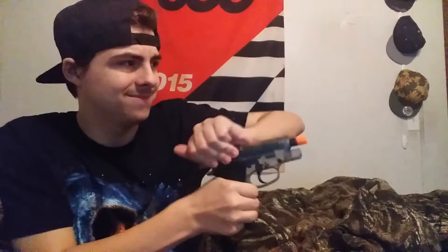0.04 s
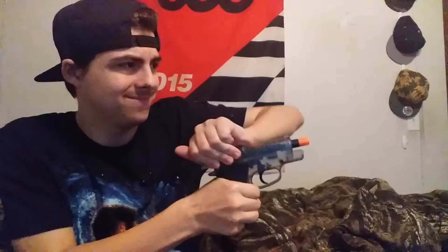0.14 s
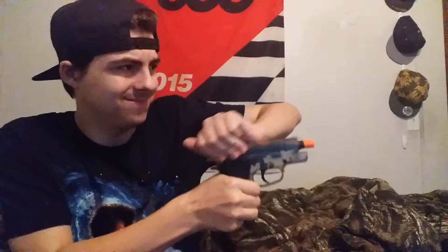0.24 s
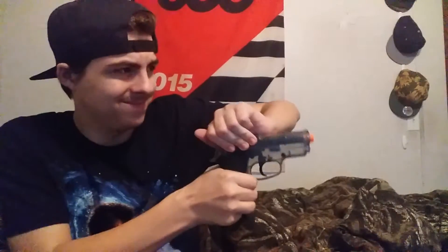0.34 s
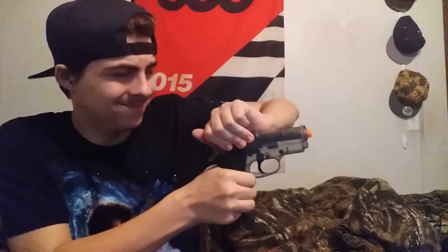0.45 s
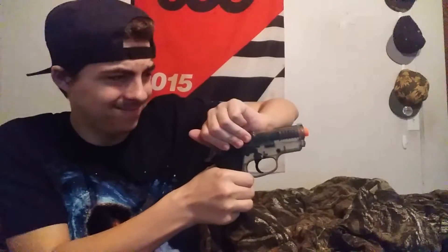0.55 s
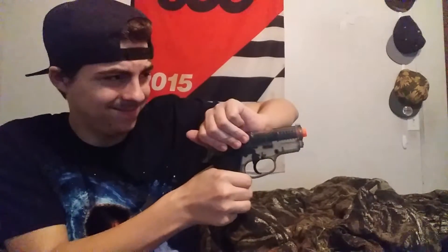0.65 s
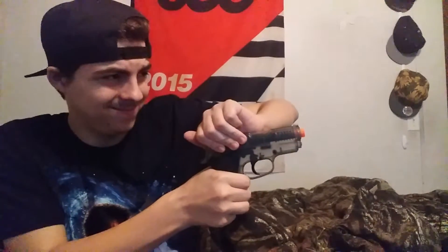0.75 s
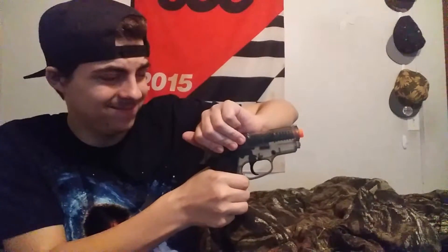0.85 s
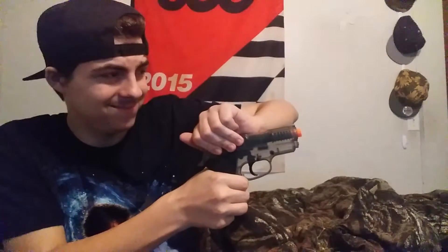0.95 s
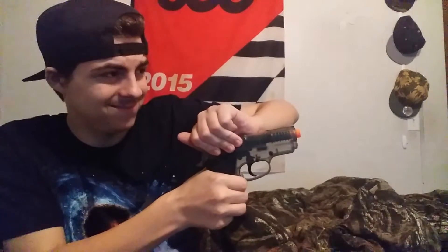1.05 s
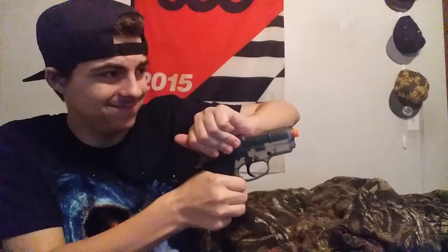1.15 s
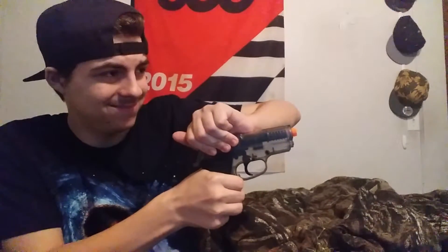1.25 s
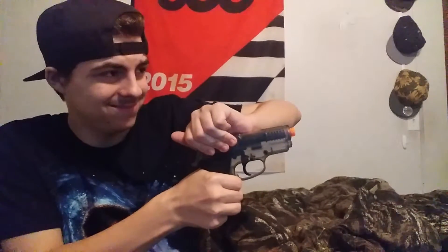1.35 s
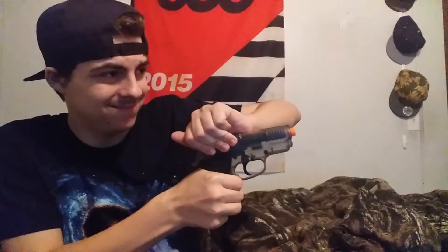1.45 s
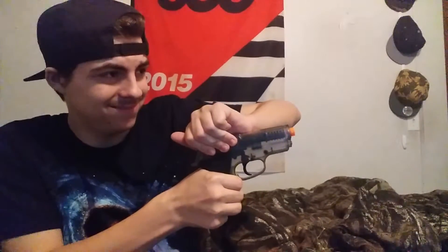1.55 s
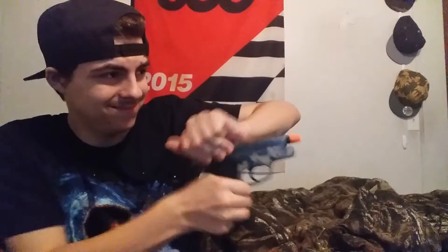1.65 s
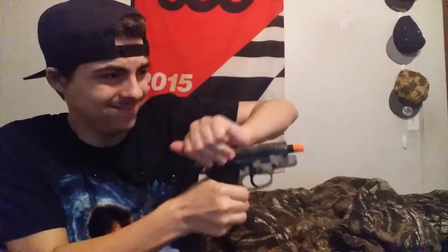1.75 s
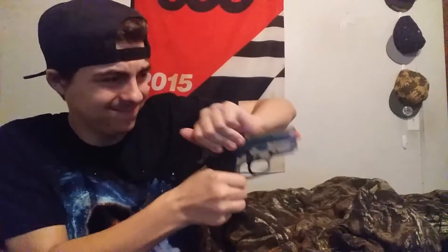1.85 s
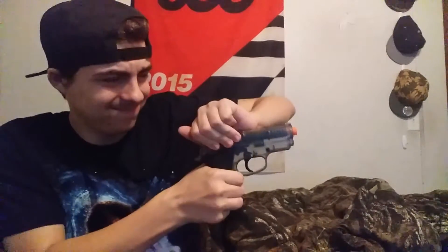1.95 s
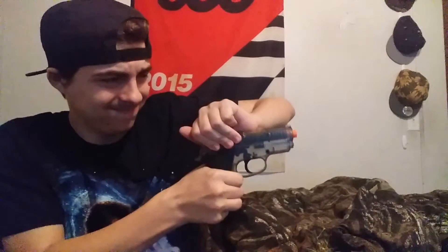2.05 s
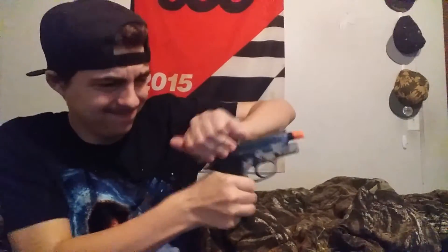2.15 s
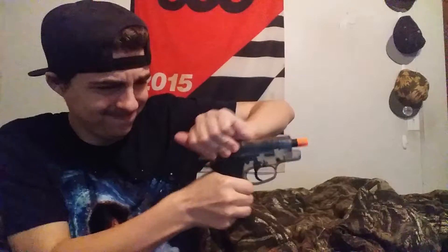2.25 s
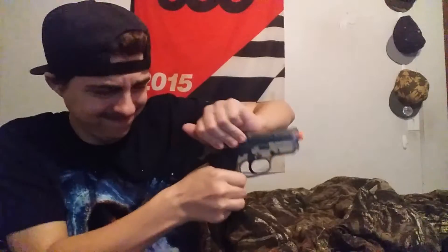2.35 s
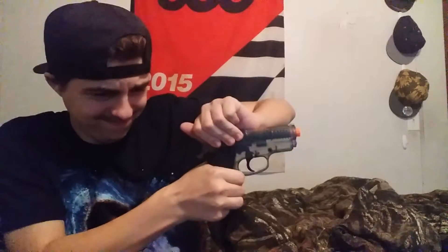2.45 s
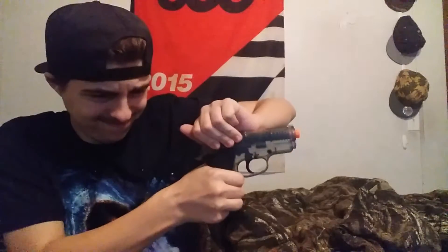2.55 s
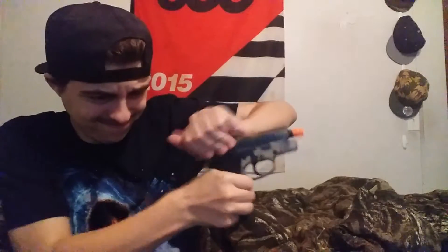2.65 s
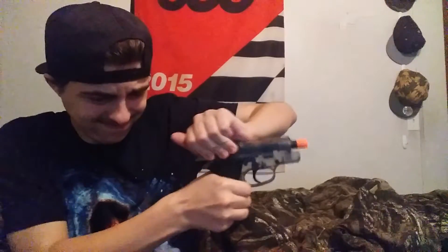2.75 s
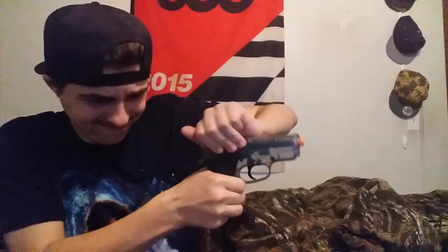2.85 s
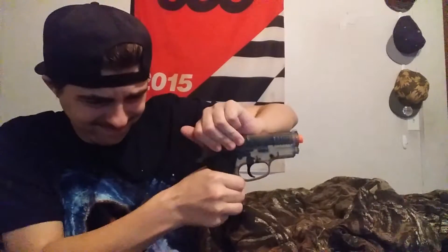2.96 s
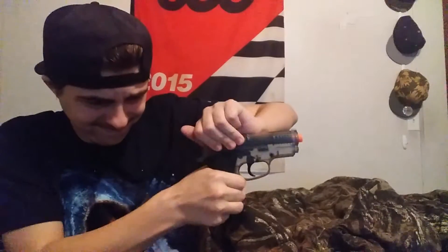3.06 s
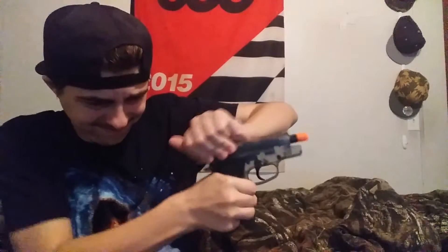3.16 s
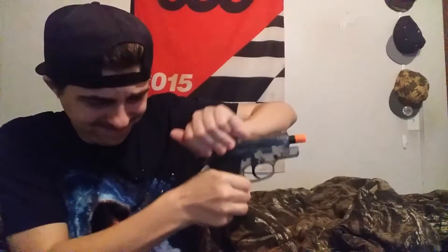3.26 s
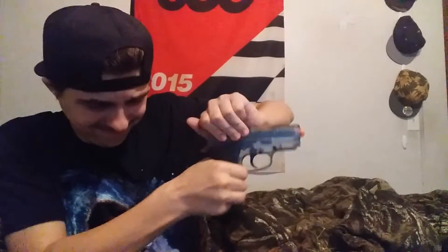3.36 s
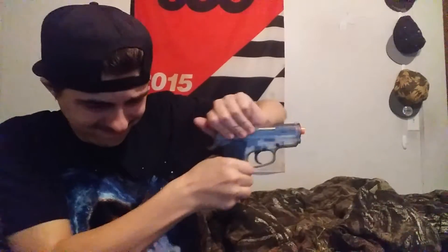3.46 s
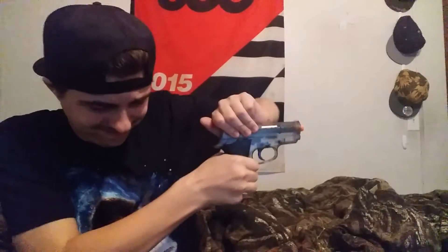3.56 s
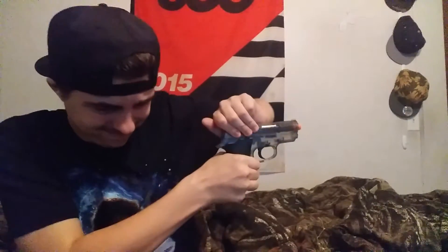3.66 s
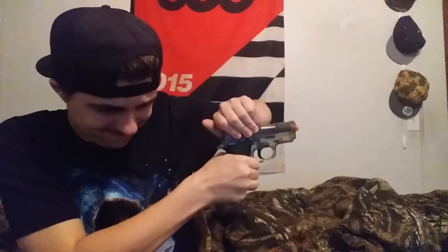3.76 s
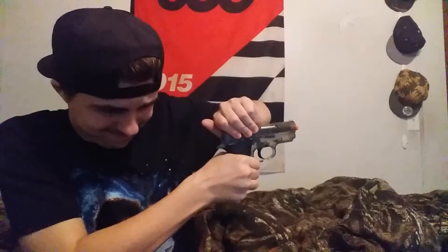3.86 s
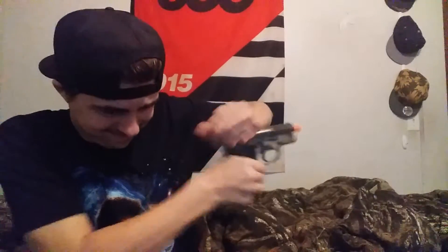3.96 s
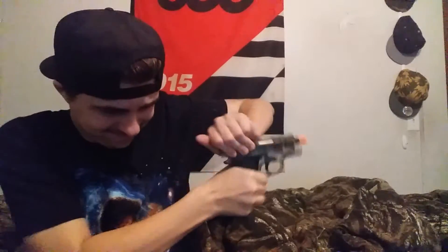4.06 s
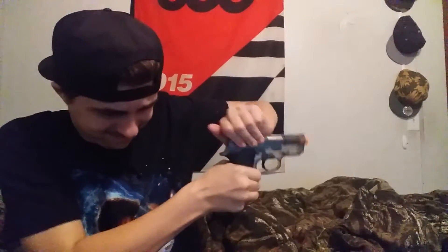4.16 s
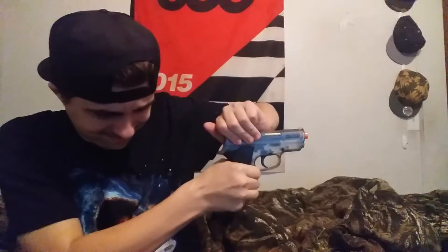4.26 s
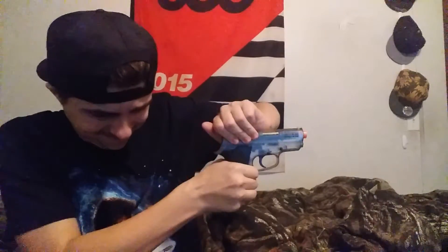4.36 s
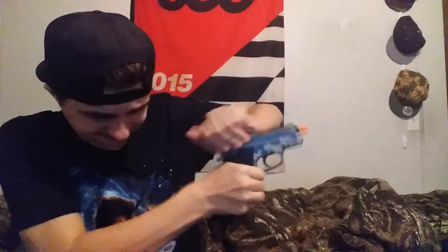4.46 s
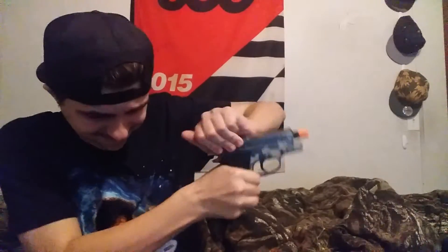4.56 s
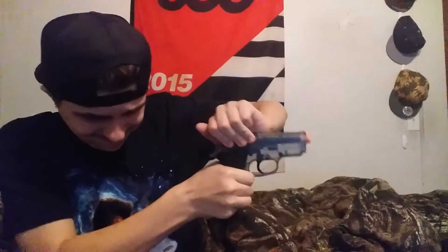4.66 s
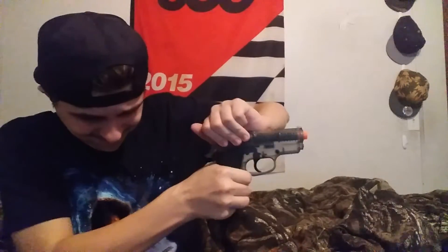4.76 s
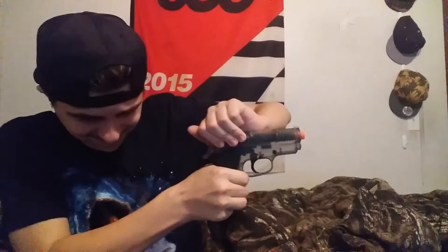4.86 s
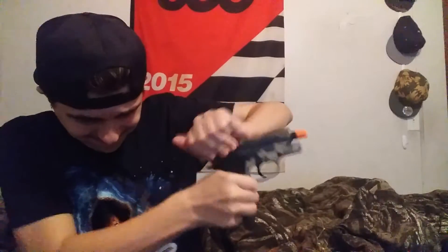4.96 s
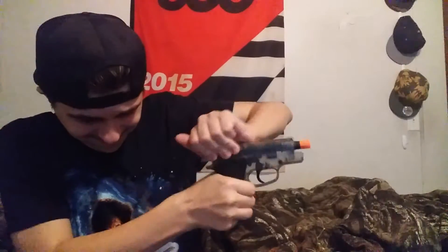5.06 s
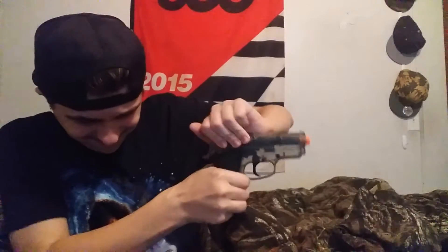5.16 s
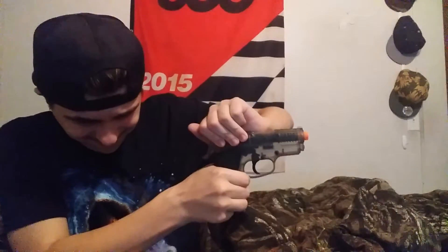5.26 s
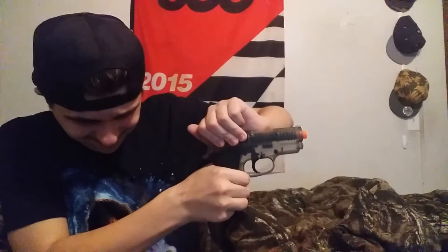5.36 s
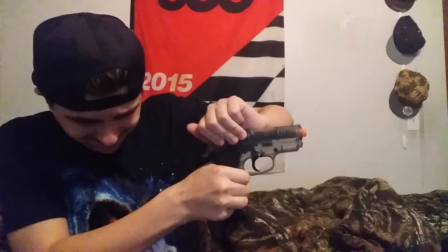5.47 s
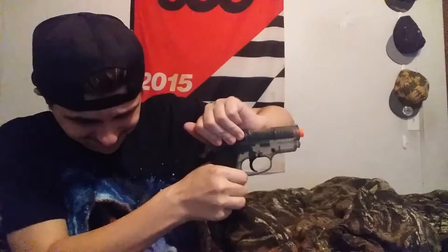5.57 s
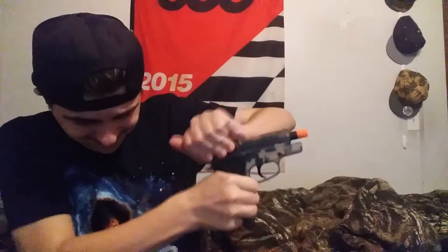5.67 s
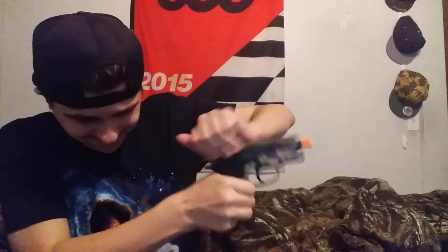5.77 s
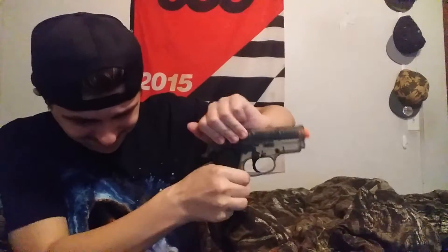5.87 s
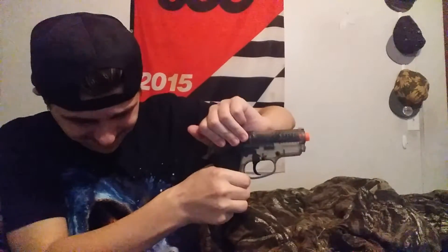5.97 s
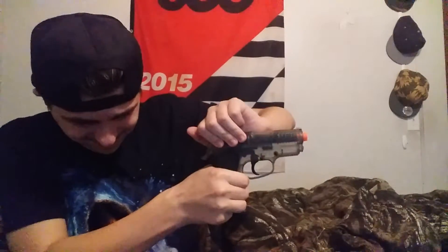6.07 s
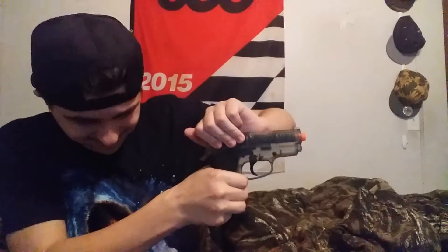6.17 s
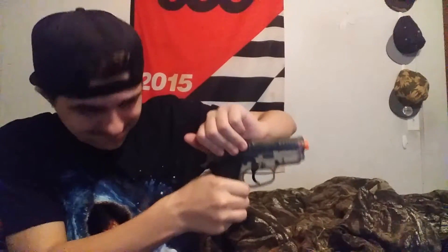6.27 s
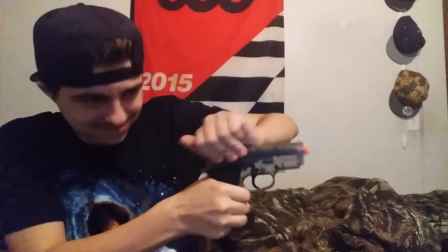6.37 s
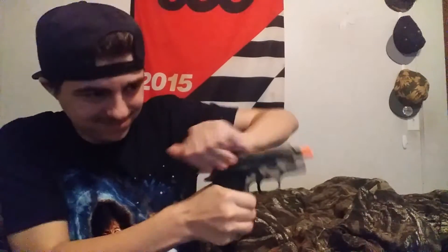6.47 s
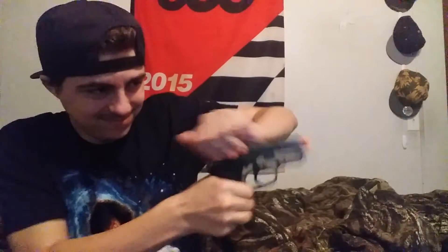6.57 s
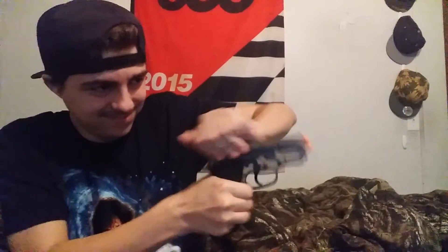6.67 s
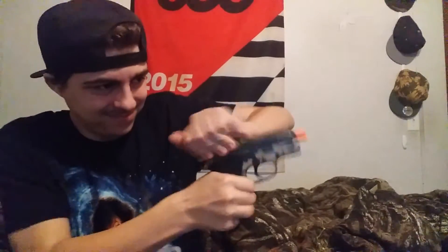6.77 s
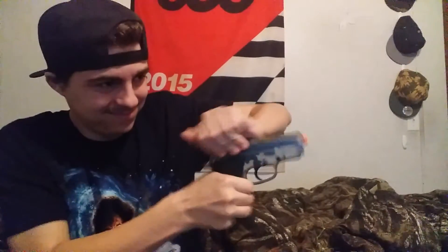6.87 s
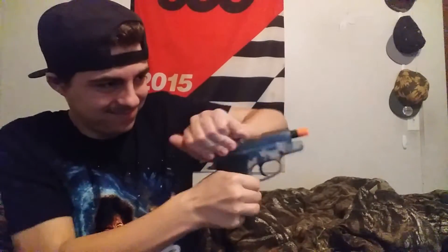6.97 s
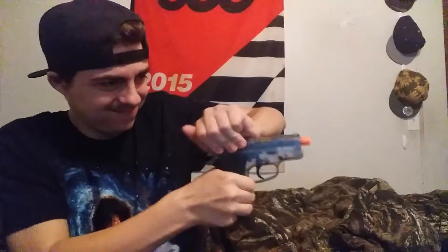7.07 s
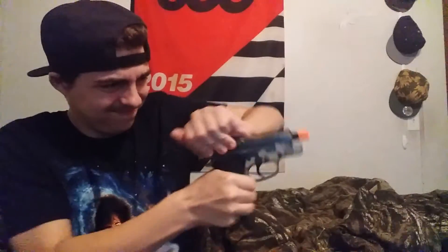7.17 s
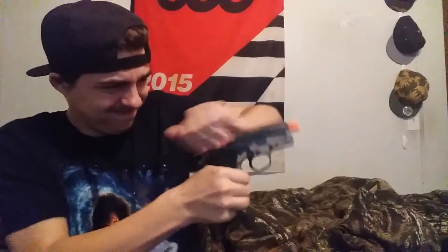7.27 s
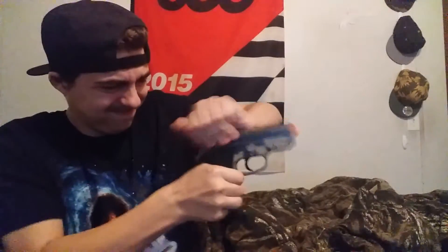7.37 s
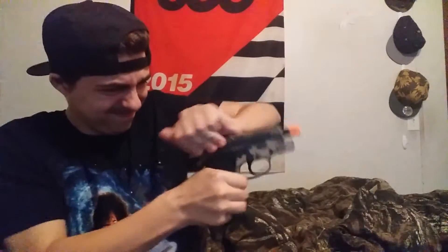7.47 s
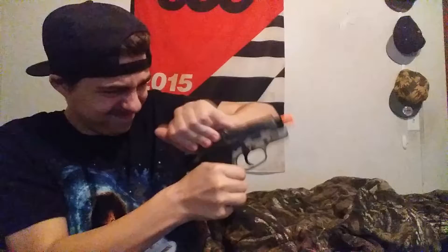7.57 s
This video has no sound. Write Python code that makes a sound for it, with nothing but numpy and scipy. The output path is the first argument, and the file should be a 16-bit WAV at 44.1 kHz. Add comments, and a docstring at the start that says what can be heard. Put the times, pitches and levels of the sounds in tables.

```python
"""A spring airsoft pistol is racked and fired again and again in a small room, close to the microphone.
The plastic slide sticks and slips back, then clacks against its stop: noise bursts and damped knocks.
The piston slams forward with a falling bass swing and a puff of air; decaying sines ring on after it.
Pellets strike across the room a moment later as reverberant ticks, and a few skip off things.
Faint rumble and hiss of the room, made of coloured noise, lie beneath."""
import sys
import numpy as np
from scipy import signal
from scipy.fft import rfft, irfft
from scipy.io import wavfile

SR = 44100
rng = np.random.default_rng(int(sys.argv[2]) if len(sys.argv) > 2 else 0)


def inscribe(sig):
    """Save sig as 16-bit PCM at rate SR to the path in sys.argv[1].

    A 1-D sig is mono; a 2-D sig holds one channel per row.
    Samples are clipped to [-1, 1] before scaling.
    """
    pcm = np.round(np.clip(np.atleast_2d(sig).T, -1, 1) * 32767)
    wavfile.write(sys.argv[1], SR, pcm.astype(np.int16))


N = 336264  # length in samples
T = np.arange(SR * 3 // 5) / SR  # time axis of one short sound, s
HZ = np.fft.rfftfreq(4096, 1 / SR)  # frequency axis of the colour filters, Hz

# Levels in the tables are relative: each function adds its own gain.
# The piston slams home after the slide has run forward: t/s, blow level/dB, thump level/dB,
# spring t60/s (set by the grip), travel time/s, slip level/dB
SLAMS = [(0.386, -5.5, -33.5, .8, 0.031, -8.5), (1.886, -8, -25.5, 0.97, 0.023, -7.5),
         (2.384, -10, -26, 1, 0.02, -10), (2.884, -9.5, -51.5, 1, 0.022, -11.5),
         (3.394, -8.5, -35.5, 1.1, .017, -13), (4.202, -6.5, -31, 1, 0.016, -9.5),
         (4.712, -7, -22.5, 1.2, 0.016, -5.5), (5.195, -6, -36, 1.2, 0.02, -9),
         (5.875, -8.5, -22, 1.8, 0.016, -10.5), (6.614, -11, -32, 0.33, 0.014, -18.5),
         (7.309, -10, -23.5, 0.73, 0.015, -14.5)]
# The slide hits its stop; the one at 5.26 s is a thud just after a shot: t/s, knock level/dB, knock f/Hz,
# crack level/dB, thump level/dB, time since the slip before it/s, slip level/dB
STOPS = [(0.125, -22, 1830, -16.5, -53, 0.036, -15), (1.7484, -12, 1700, -11, -26.5, 0.026, -13.5),
         (2.2414, -18, 1805, -16, -46, 0.03, -13), (2.7518, -16, 1670, -17, -49, .032, -12.5),
         (3.2358, -16, 1645, -15.5, -45, 0.038, -14), (4.065, -14.5, 2050, -15, -50, 0.028, -13),
         (4.5691, -14, 1770, -13.5, -53, .036, -10), (5.0557, -13.5, 1770, -13.5, -50.5, 0.037, -10.5),
         (5.2589, -42, 1650, -18.5, -25.5, 0.037, -27), (5.7414, -10, 1707, -17, -52, .029, -13),
         (6.5109, -13.5, 1760, -22, -52, .028, -19.5), (7.0469, -15.5, 1830, -20, -48, 0.024, -16),
         (7.184, -12, 1680, -28.5, -74, .035, -19.5), (7.5108, -22, 1500, -22, -46, 0.031, -16)]
# Spectrum of hard plastic contact: f/Hz, level per Hz/dB
CRACK_SPECTRUM = [(88, -61), (150, -20), (466, -23), (1060, -5), (1530, -9), (1790, -0.5), (2270, -7.5),
                  (2550, -5.5), (2920, -7.5), (4410, -10), (9820, -13), (15100, -14), (16000, -5)]


def shots(count=3, rattle_db=-7):
    """Impact and rebound: the piston slams home, excites the modes and spring, and pushes out a puff of air."""
    # spectrum of the slam: f/Hz, level per Hz/dB
    slam_spectrum = [(88, -48.5), (150, -24), (240, -22.5), (675, -11.5), (960, 0), (1190, -7.5),
                     (1560, -5.5), (2600, -11), (2920, -8), (3420, -12), (4860, -13.5), (5570, -16),
                     (7920, -14.5), (8730, -22.5), (16000, -23)]
    treble_lift_db = 3.5  # reached two octaves above 2 kHz
    puff_db, puff_share = 15.5, 0.59  # the hollow puff grows by this share of the thump's dB
    lift = np.clip(np.log2((HZ + 1) / 2000) / 2, 0, 1)
    blow_db = read(slam_spectrum, HZ) + treble_lift_db * lift
    out = np.zeros((2, N))
    for s, db, thump_db, spring_t60, *_ in SLAMS:
        blow = burst(blow_db, length=0.0046, alike=0.49)
        for k, when in enumerate(rng.random(count)):  # rebounds
            rattle = amp(rattle_db - 2 * k) * burst(blow_db, length=0.0022, alike=0.14)
            add(blow, .007 + .007 * (k + when), rattle)
        blow = amp(db + 18.5) * blow
        add(out, s, room(blow, wet_db=-0.5, near_db=-6.5, walls_db=-6.0, near_decay=0.027))
        first_touch = amp(db + 6.5) * burst(blow_db, length=0.0047, alike=0.15)
        add(out, s - .002, first_touch)  # a first light contact leads into the slam
        puff_gain = amp(puff_db + puff_share * thump_db)
        puff = puff_gain * burst(hump(470, steep_db=6.5), length=0.0012, alike=0.78)
        add(out, s + .001, room(puff, wet_db=-18.5, near_db=-0.5, walls_db=-9.5, alike=1.0))
        add(out, s + 0.0017, amp(thump_db + 35.5) * thump())
        add(out, s + 0.001, amp(db - 1.0) * ring())
        add(out, s, spring(spring_t60))
    return out


def spring(t60):
    """Beating of two close modes: the coil rings on and a weak twin mode beats slowly against it."""
    main_hz, twin_hz = 958, 963.5
    level_db, twin_db = -52, -13  # the twin is relative to the main mode
    t = np.arange(2 * SR) / SR
    main = np.sin(2 * np.pi * main_hz * t)
    twin = amp(twin_db) * np.sin(2 * np.pi * (twin_hz * t + rng.random()))
    return amp(level_db) * 1000 ** (-t / t60) * (main + twin)


def ring(detune=0.00073, scatter_db=2):
    """Modal ringing: damped modes of gun and room differ a little in pitch and level from blow to blow."""
    # modes of gun and room, before scatter; the lowest few are the room's, the others the gun's:
    # f/Hz, level/dB, t60/s
    modes = [(395, -29, .2), (544, -28, .16), (613, -26, .18), (836, -26, .14), (972, -18, .12),
             (993, -13, .18), (1102, -20, .15), (1545, -19, .16), (1818, -18, .2), (2412, -24, .19),
             (2912, -21, .17), (3550, -25, .19), (4218, -24, .18), (4772, -21, .14), (7338, -24, .17)]
    out = np.zeros((2, len(T)))
    draws = rng.standard_normal((len(modes), 4))
    for (hz, db, t60), (shift, size, phase, side) in zip(modes, draws):
        port_phase = side * np.array([[.1], [-.1]])
        turns = hz * (1 + detune * shift) * T + phase + port_phase
        out += amp(db + scatter_db * size) * 1000 ** (-T / t60) * np.sin(2 * np.pi * turns)
    return out


def thump(rise=0.0012, decay=.011, extra_hz=400, end_hz=30, fall=0.0014, port_lead=0.28):
    """Phase dispersion: an air pulse at the microphone, smeared by its high-pass into a falling bass swing."""
    hz = end_hz + extra_hz / (1 + T / fall)
    port_turns = np.array([[.5], [-.5]]) * port_lead  # the two ports are out of step
    phase = 2 * np.pi * np.cumsum(hz) / SR + port_turns
    return -unit((1 - np.exp(-T / rise)) * np.exp(-T / decay) * np.sin(phase))


def clacks(latch_lead=0.0072):
    """Impact on a stop: a sear click, then a bright crack, a hollow knock and a thump; once mostly a thud."""
    out = np.zeros((2, N))
    for s, db, hz, crack_db, thump_db, *_ in STOPS:
        add(out, s - latch_lead, amp(db - 2.5) * knock(1350, rise=0.0021))
        crack = amp(crack_db + 25.0) * burst(read(CRACK_SPECTRUM, HZ), length=.003, alike=0.57)
        add(out, s, room(crack, wet_db=1, near_db=-5.5, walls_db=-3.5))
        shell = amp(db + 19) * knock(hz, rise=0.0013)
        add(out, s + 0.00058, room(shell, wet_db=-12.5, near_db=-2.5, walls_db=-8.0))
        add(out, s, amp(db - 14.5) * ring())
        add(out, s + 0.0019, amp(thump_db + 29) * thump())
    return out


def slide():
    """Stick-slip friction: the slide slips before each stop and shot, or as the hand shifts."""
    # the hand shifts on the gun between strokes: t/s, knock level/dB, nominal knock f/Hz
    fumbles = [(0.008, -40.5, 1030), (0.253, -25.5, 1935), (1.1397, -32.5, 1700), (6.7322, -19, 1560),
               (6.8453, -20.5, 1393), (6.93, -24.5, 1540), (6.9534, -27.5, 1810)]
    fumble_scrape_db, fumble_spread = -13.5, .008  # dB, s
    # each blow is preceded by a weak nudge, at a multiple of the travel time before it;
    # then by the main slip, one travel time before it
    pull_nudge, pull_nudge_db, pull_hz, pull_scrape_db = 1.8, -15, 1640, -11.5
    return_nudge, return_nudge_db, return_hz, return_scrape_db = 1.1, -7, 1620, -8.5
    nudge_scrape_db = -15
    stutter_share = .45  # of the travel time: how early the small slips begin
    moves = [(s, db, hz, fumble_scrape_db, fumble_spread) for s, db, hz in fumbles]
    for s, *_, travel, db in STOPS:
        spread = stutter_share * travel
        moves.append((s - pull_nudge * travel, db + pull_nudge_db, pull_hz, nudge_scrape_db, spread))
        moves.append((s - travel, db, pull_hz, pull_scrape_db, spread))
    for s, *_, travel, db in SLAMS:
        spread = stutter_share * travel
        moves.append((s - return_nudge * travel, db + return_nudge_db, return_hz, nudge_scrape_db, spread))
        moves.append((s - travel, db, return_hz, return_scrape_db, spread))
    out = np.zeros((2, N))
    for s, db, hz, scrape_db, spread in moves:
        add(out, s - spread, slip(db, hz, scrape_db, spread))
    return out


def slip(db, hz, scrape_db, spread, count=5, stutter_db=-11):
    """Release of friction: a knock and a scrape amid smaller slips that begin spread seconds before."""
    out = np.zeros((2, len(T)))
    add(out, spread + .001, amp(5) * knock(hz * .95, rise=0.00064))
    scrape = amp(scrape_db + 11.5) * burst(scrape_colour(), length=0.0033, alike=0.45)
    add(out, spread + 0.00081, scrape)
    add(out, .003, amp(scrape_db + 16.0) * grit(length=2 * spread))
    for k, (when, pitch, size) in enumerate(rng.random((count, 3))):
        small_hz = hz * 2 ** (.9 * (pitch - .7))
        small = amp(12.5 + stutter_db + 10 * (size - 1.0)) * knock(small_hz, rise=0.0011)
        add(out, .002 + 1.8 * spread * (k + when) / count, small)
    return amp(db) * room(out, wet_db=-1.0, near_db=-7.5, walls_db=-8.0)


def grit(length, count=14):
    """Granular friction: a few sharp grains of very unequal size swell and fade with the slip."""
    when, size, side = rng.random((count, 3)).T
    grains = np.zeros((2, len(T)))
    left_at = (when * length * SR).astype(int)
    right_at = left_at + (8 * side).astype(int)  # the right port lags by up to 7 samples
    signs = (-1.) ** np.arange(count)
    heights = np.sin(np.pi * when) * size ** 3 * signs
    grains[0, left_at] = heights
    grains[1, right_at] = heights
    return unit(colour(grains, scrape_colour()))


def scrape_colour():
    """Friction spectrum: plastic rubbing on the rail is duller than a crack; dB over HZ."""
    dull_db = -2.5  # per octave above 2 kHz
    return read(CRACK_SPECTRUM, HZ) + dull_db * np.log2(np.maximum(HZ / 2000, 1))


def knock(hz, rise):
    """Heavily damped resonance: the hand-held plastic shell swells and dies within a few cycles."""
    swell = (T / rise) ** 2 * np.exp(-2 * T / rise)
    return unit(swell * np.sin(2 * np.pi * (hz * T + rng.random())))


def burst(db, length, alike, evenness=0.38):
    """Broadband impact: a short chatter of hard contacts of colour db, partly alike at the two ports."""
    window = np.exp(-(T / length) ** 4) * (1 - np.exp(-8 * T / length))
    chatter = port_noise(len(T), alike) * window
    for _ in range(2):
        spectrum = rfft(chatter)
        # hard contacts excite all pitches much alike
        even = spectrum / (abs(spectrum) + 1e-12) ** np.clip(evenness, 0, 1)
        chatter = irfft(even, len(T)) * np.exp(-(T / length / 1.6) ** 4)
    return unit(colour(chatter, db))


def pellets():
    """Time of flight: each loaded shot hits across the room and ricochets at once; strays skip later."""
    # flight time across the room/s, shot by shot; the magazine is empty for the last three shots
    flight_times = [.063, .065, .061, .066, .066, .0615, .0635, .065]
    # spent pellets skip off things across the room: t/s, tick level/dB, top treble level/dB,
    # direct level against the tick/dB, body level/dB, body f/Hz
    strays = [(0.8915, -19, 8, 6.5, -49.5, 360), (0.9976, -33, 5, 10, -48, 715),
              (1.096, -37.5, -2, 7, -61, 450), (3.763, -21, 0.5, 6.5, -43, 301),
              (5.5719, -17.5, 2.5, 1, -50.5, 305)]
    ricochet_delay, skip_delay, skip_db = .0085, .0042, -1.5  # s, s, dB
    out = np.zeros((2, N))
    for (s, *_), flight in zip(SLAMS, flight_times):
        hit = strike(-14, treble_db=0.5, direct_db=4, body_db=-41.5, body_hz=290)
        add(out, s + flight, hit)
        ricochet = strike(-14, treble_db=5, direct_db=11.5, body_db=-37, body_hz=245)
        add(out, s + flight + ricochet_delay, ricochet)
    for s, *touch in strays:  # each touches twice
        add(out, s, strike(*touch))
        add(out, s + skip_delay, amp(skip_db) * strike(*touch))
    return out


def strike(db, treble_db, direct_db, body_db, body_hz):
    """Reverberant impact: a far, sharp tick mostly by way of the room, and a dull boom of what was hit."""
    # spectrum of the tick: f/Hz, level per Hz/dB
    tick_spectrum = [(71, -22), (120, -8.5), (348, -5), (546, -1.5), (856, -4.5), (1160, -7.5), (2070, -1),
                     (3170, -2), (4880, 0), (5750, -4), (6770, -0.5), (14700, -8), (16000, -1)]
    tilt_db = treble_db * np.clip((HZ - 7000) / 7000, -1, 1)
    tick = amp(db + 9.5) * burst(read(tick_spectrum, HZ) + tilt_db, length=.0012, alike=0.042)
    boom = amp(body_db + 13.5) * burst(hump(body_hz, steep_db=4.5), length=.004, alike=0.89)
    direct = amp(direct_db) * tick
    far_tick = room(tick, wet_db=10.5, near_db=11.5, walls_db=-7.0, near_decay=0.023, alike=0.019)
    far_boom = room(boom, wet_db=12.5, near_db=-21.0, walls_db=-1.5, alike=1.0)
    return direct + far_tick + far_boom


def hump(hz, steep_db):
    """Broad resonance: dB over HZ, falling by steep_db one octave from its centre."""
    return -steep_db * np.log2((HZ + 1) / hz) ** 2


def room(x, wet_db, near_db, walls_db, near_decay=0.0048, alike=0.19):
    """Room impulse response: direct sound, wall echoes, quick near scatter and a tail dying band by band."""
    # reverberation: f/Hz, t60/s
    room_t60 = [(100, 0.55), (300, 0.35), (700, 0.3), (1800, 0.35), (4000, 0.36), (8000, 0.31),
                (15000, 0.24)]
    # first reflections off the walls: nominal delay/s, relative level/dB
    walls = [(.0067, -20), (0.0142, -27.5), (0.0219, -11)]
    noise = port_noise(len(T), alike)
    hz, t, bands = signal.stft(noise, SR, nperseg=256)
    decay = amp(-60 * t / read(room_t60, hz)[:, None])
    tail = signal.istft(bands * decay, SR, nperseg=256)[1][:, :len(T)]
    response = amp(wet_db) * unit(tail * (1 - np.exp(-T / 0.0022)))
    response += amp(near_db) * unit(noise[:, ::-1] * T * np.exp(-2 * T / near_decay))
    response[:, 0] += 1  # direct sound
    for delay, db in walls:
        port_delays = delay + rng.uniform(-0.0005, 0.00033, 2)
        at = np.round(port_delays * SR).astype(int)
        response[[0, 1], at] += amp(db + walls_db)
    return signal.fftconvolve(x * np.ones((2, 1)), response, axes=1)[:, :len(T)]


def floor():
    """Stationary background noise: the faint steady rumble and hiss of the room."""
    # spectrum of the background: f/Hz, relative level per Hz/dB
    floor_spectrum = [(15, -68.5), (27, -44), (46, -7.5), (64, -3.5), (108, -4.5), (145, -26), (185, -8),
                      (206, -21), (363, -30.5), (16000, -53.5)]
    level_db = -70.5  # RMS in each channel of the dry mix
    noise = rng.standard_normal((3, N))
    ports = noise[0] + 0.71 * noise[1:]
    return amp(level_db) * np.sqrt(N) * unit(colour(ports, read(floor_spectrum, HZ)))


def port_noise(length, alike):
    """Partial coherence: white noise at two ports that share the fraction alike of their energy."""
    noise = rng.standard_normal((3, length))
    alike = np.clip(alike, 0, 1)
    return np.sqrt(alike) * noise[0] + np.sqrt(1 - alike) * noise[1:]


def colour(x, db):
    """Minimum-phase filtering: a causal filter with the gain db over HZ."""
    both_sides_db = np.r_[db, db[-2:0:-1]]
    log_gain = np.log(amp(np.maximum(both_sides_db, -100)))
    # the Hilbert transform of the log gain gives the phase
    response = np.exp(np.conj(signal.hilbert(log_gain)))[:len(HZ)]
    taps = irfft(response)
    return signal.fftconvolve(x, taps[None], axes=1)[:, :x.shape[1]]


def amp(db):
    """Logarithmic level: decibels to gain."""
    return 10 ** (np.asarray(db) / 20)


def unit(x):
    """Energy normalisation: scales each channel to energy 1."""
    return x / np.sqrt(np.sum(x ** 2, axis=-1, keepdims=True) + 1e-20)


def read(points, hz):
    """Interpolation: reads a table along a log-frequency axis."""
    f, value = np.transpose(points)
    return np.interp(np.log(hz + 1), np.log(f + 1), value)


def add(mix, s, sound):
    """Superposition: adds a sound to the mix at time s, in seconds."""
    part = mix[:, max(round(s * SR), 0):][:, :sound.shape[-1]]
    part += sound[..., :part.shape[1]]


def scene():
    """Superposition of gun, pellets and room."""
    return slide() + clacks() + shots() + pellets() + floor()


def record(dry):
    """Microphone response: each port has its own colour; then clipping at full scale and a low-pass."""
    # port balance: f/Hz, left minus right level/dB
    port_balance = [(60, -3.5), (110, -2.5), (200, -0.5), (380, -2.5), (700, -1.5), (1290, 1.5), (2380, -1),
                    (4400, -1), (8120, -3.5), (15000, -4.5)]
    lean_db = read(port_balance, HZ) / 2
    left, right = colour(dry[:1], lean_db), colour(dry[1:], -lean_db)
    ports = np.clip(np.vstack([left, right]), -1, 1)
    edge = signal.firwin(255, 16000, window=("kaiser", 8), fs=SR)  # cutoff in Hz
    return signal.oaconvolve(ports, edge[None], "same", axes=1)


dry = scene()
out = record(dry)
inscribe(out)
```